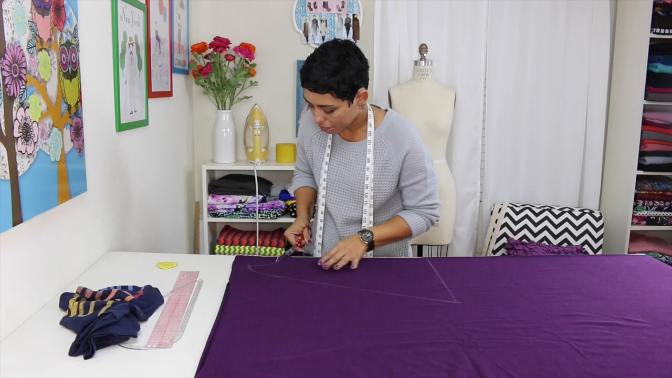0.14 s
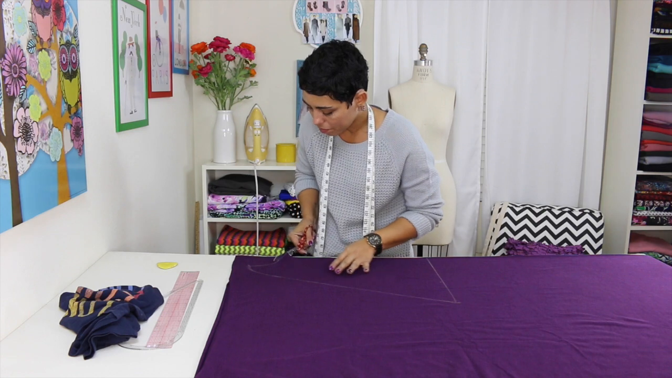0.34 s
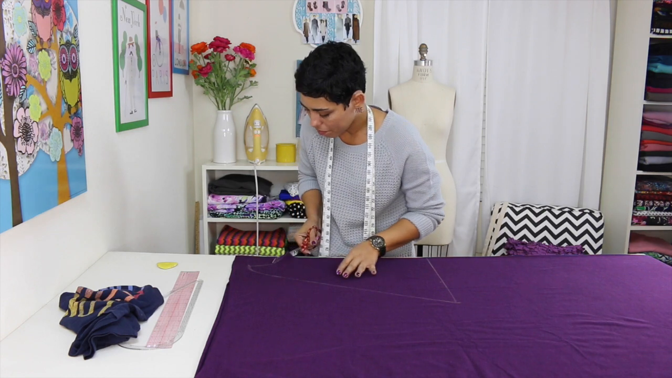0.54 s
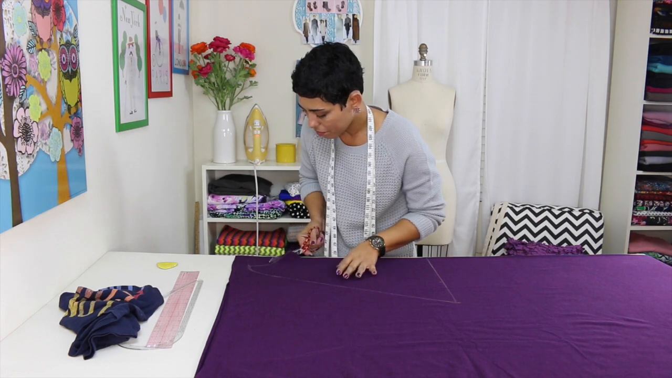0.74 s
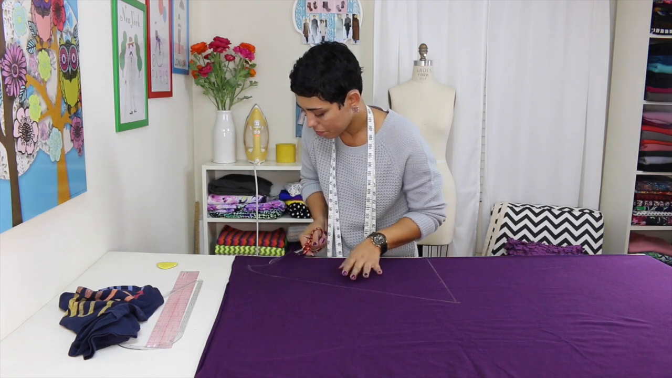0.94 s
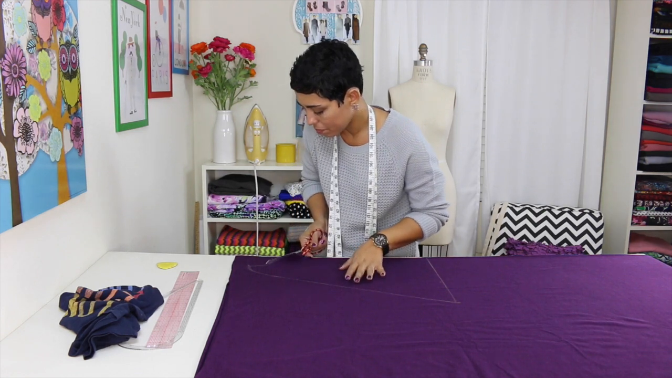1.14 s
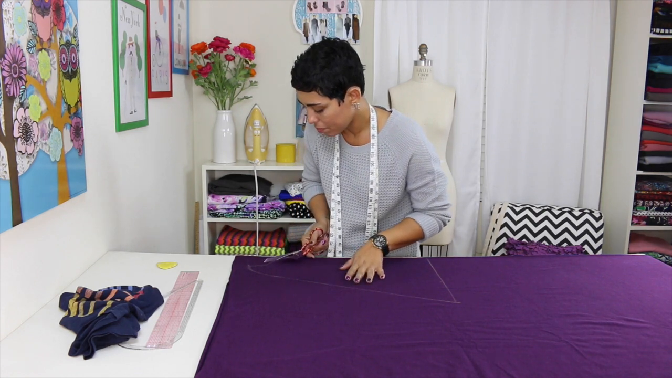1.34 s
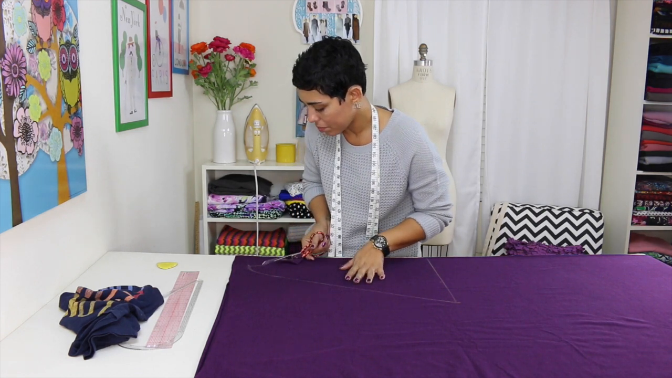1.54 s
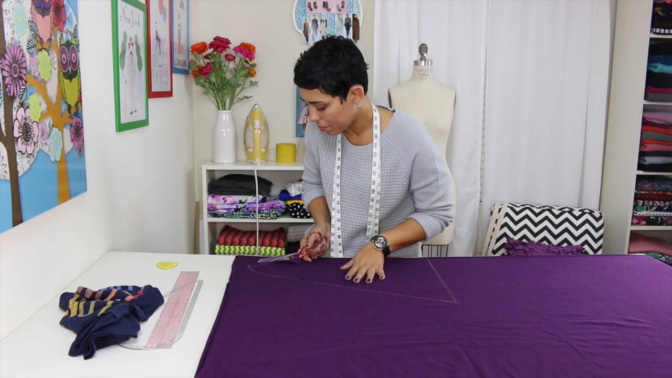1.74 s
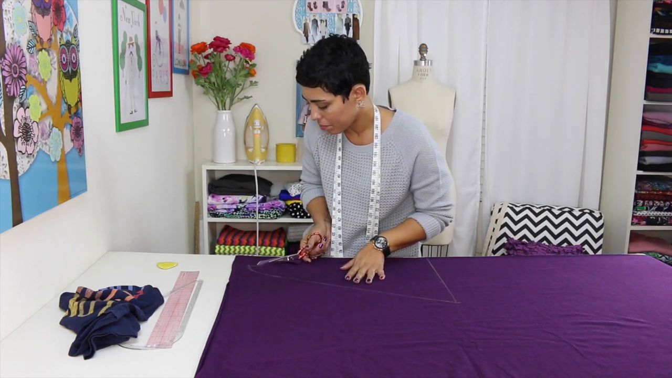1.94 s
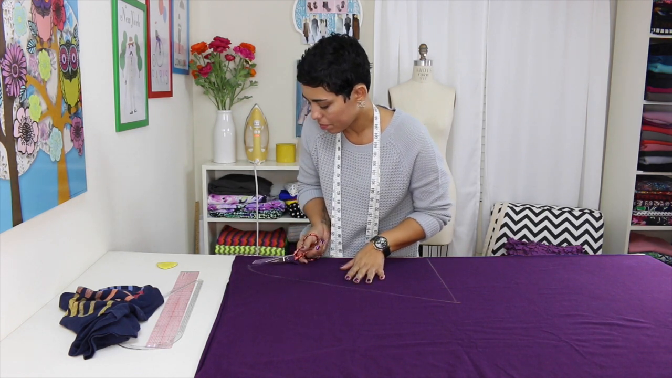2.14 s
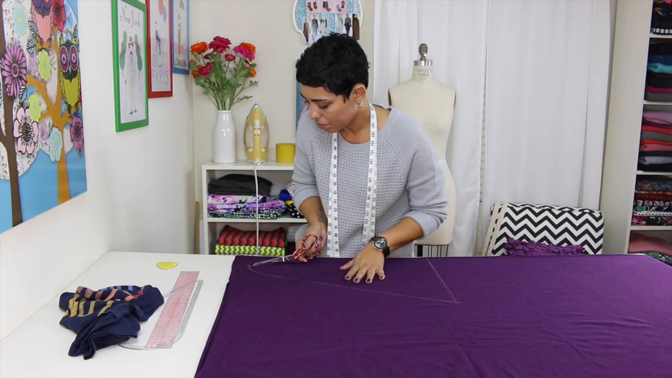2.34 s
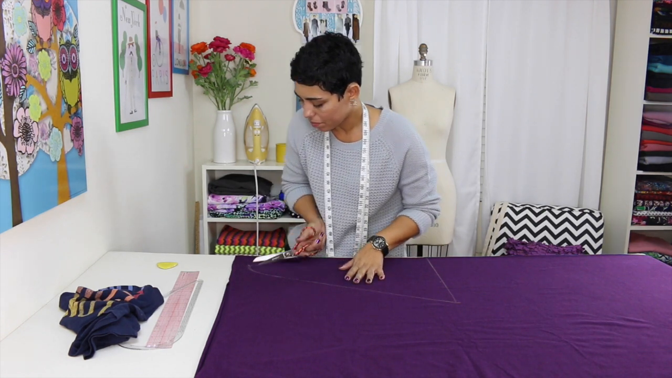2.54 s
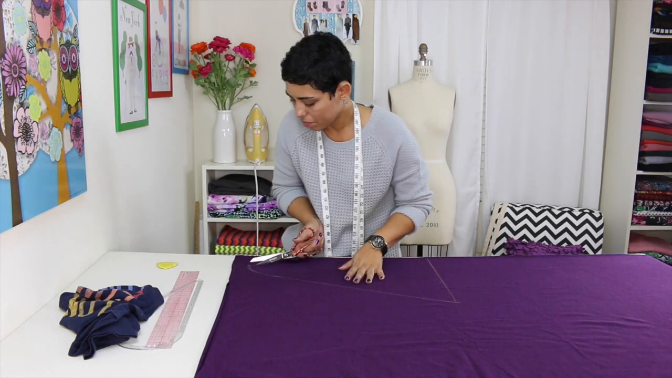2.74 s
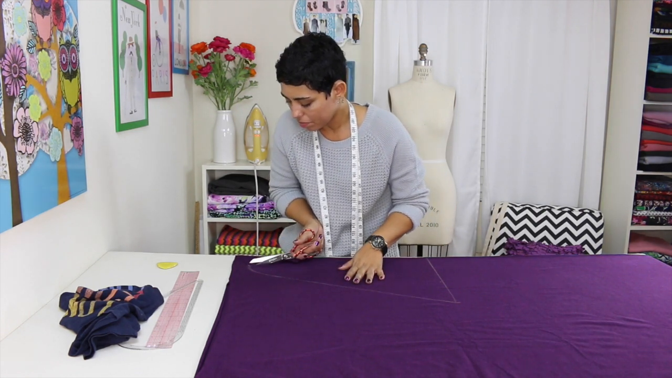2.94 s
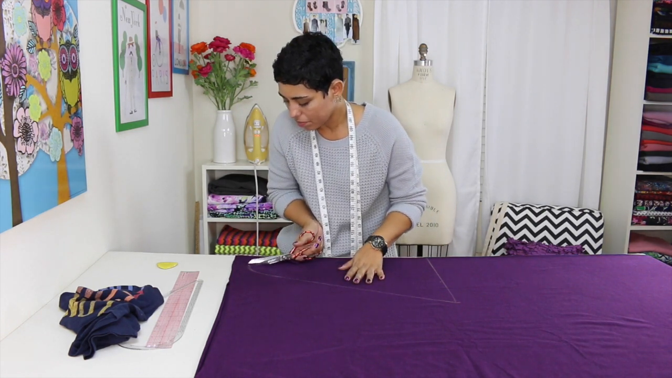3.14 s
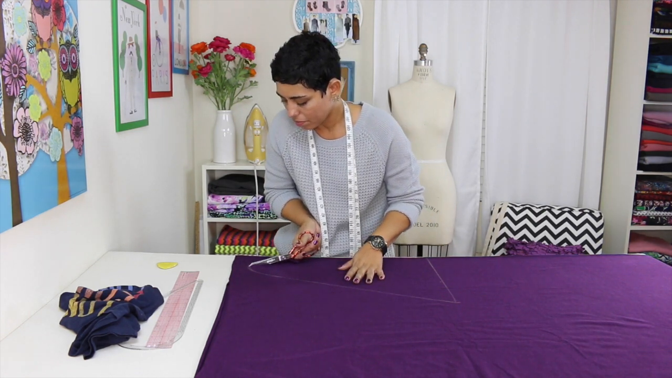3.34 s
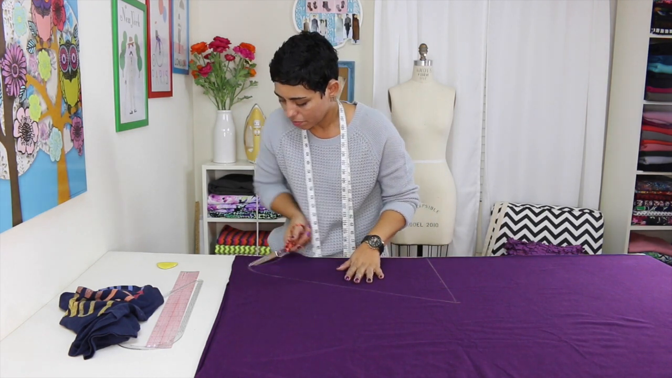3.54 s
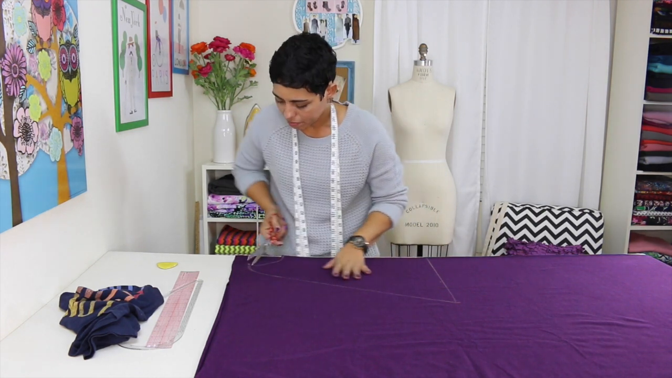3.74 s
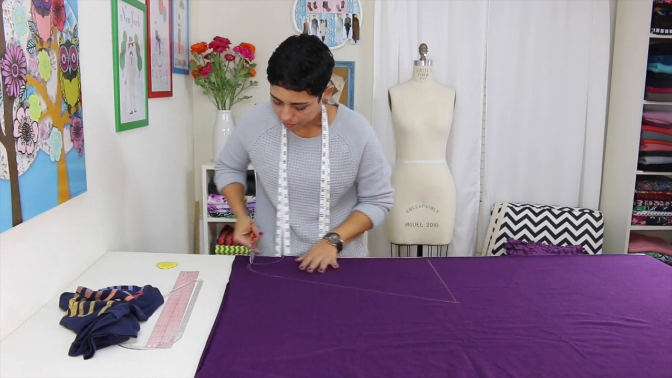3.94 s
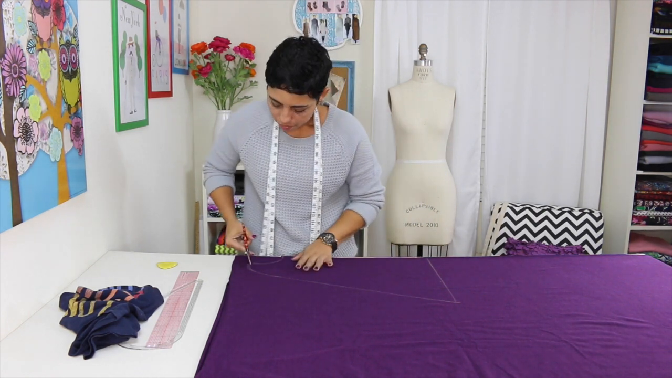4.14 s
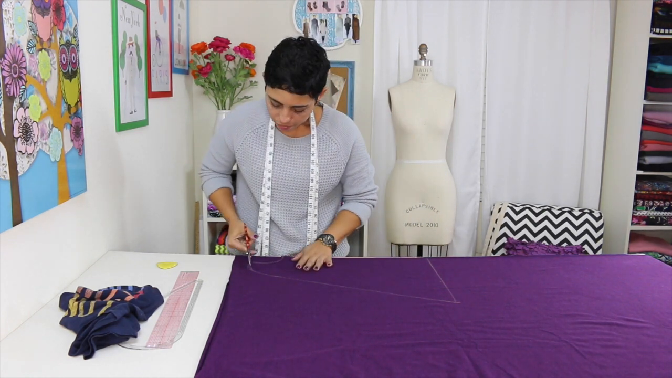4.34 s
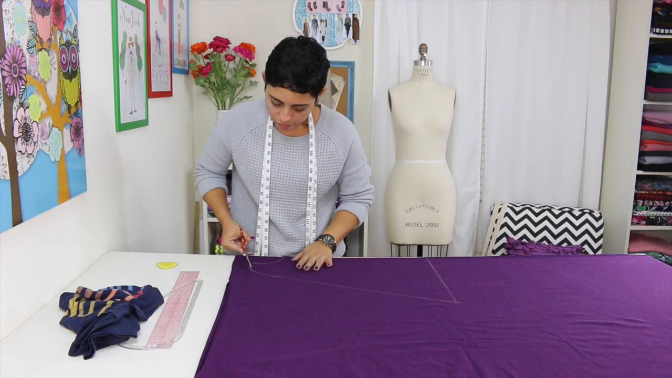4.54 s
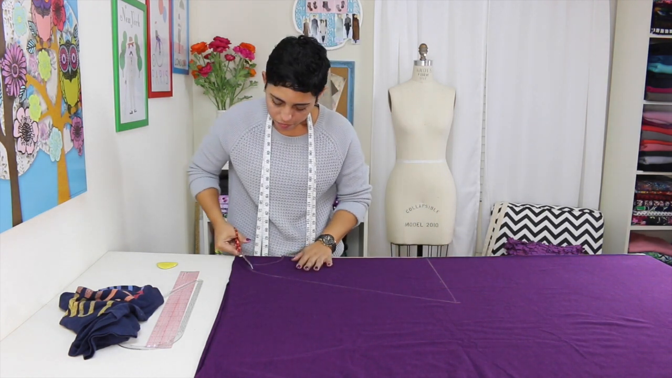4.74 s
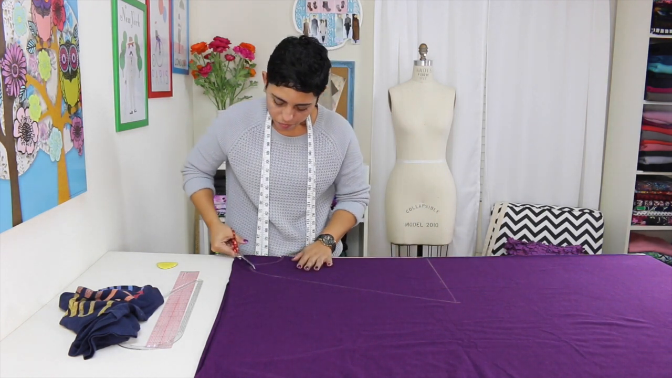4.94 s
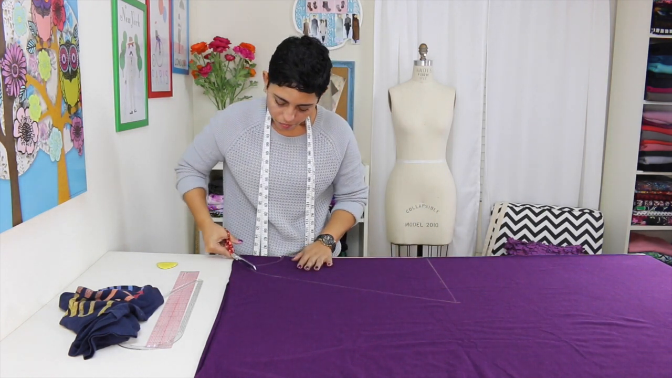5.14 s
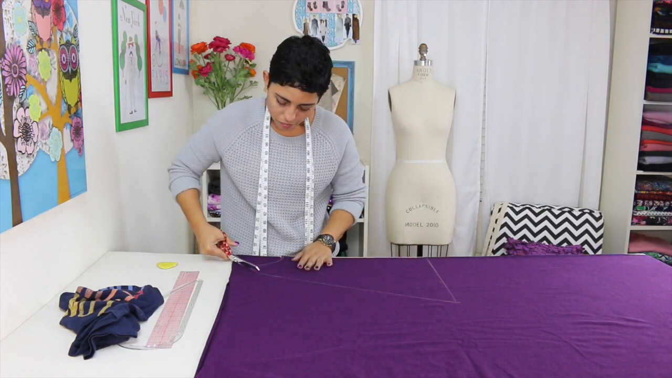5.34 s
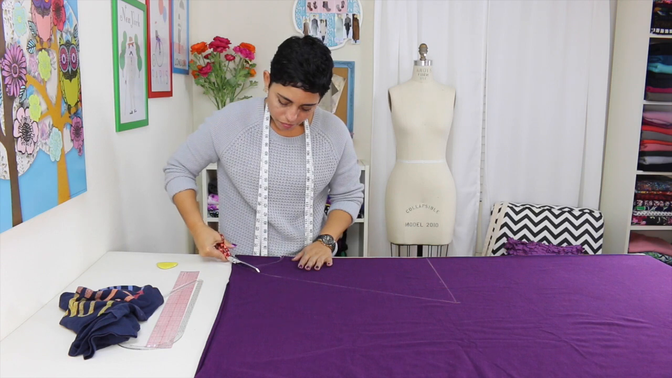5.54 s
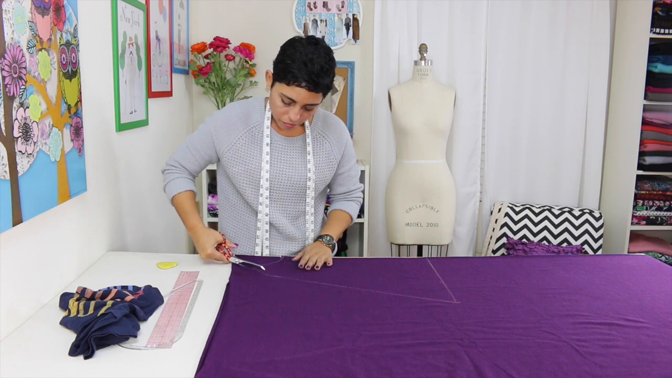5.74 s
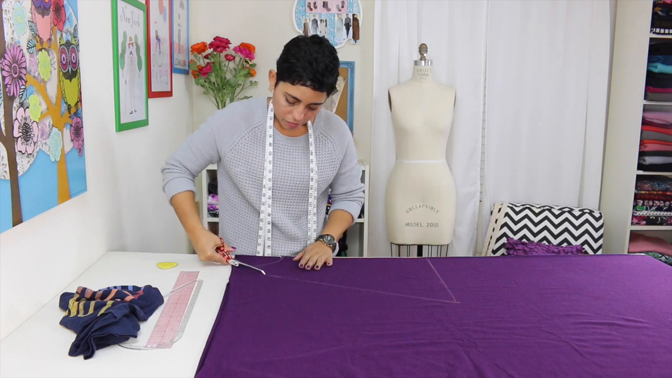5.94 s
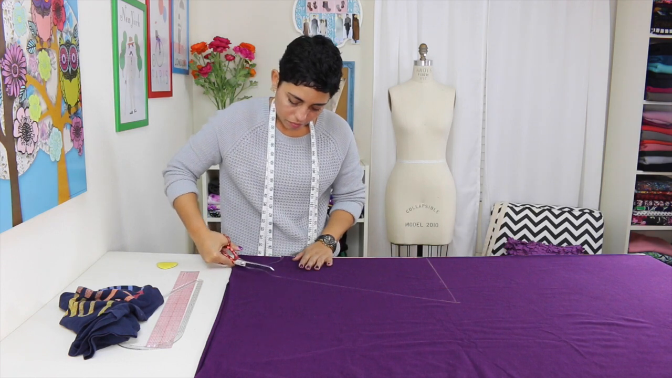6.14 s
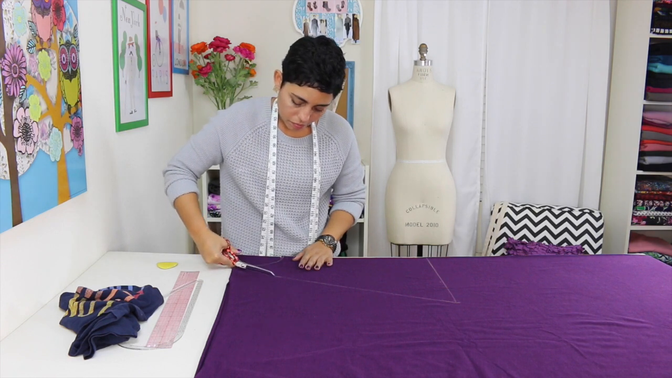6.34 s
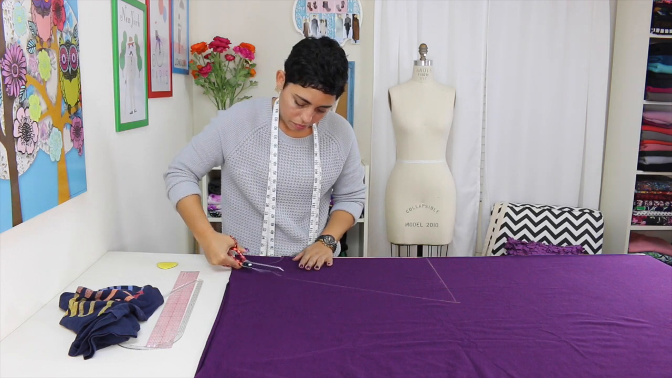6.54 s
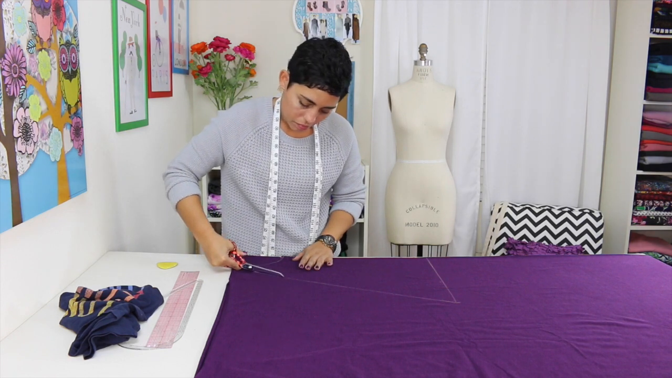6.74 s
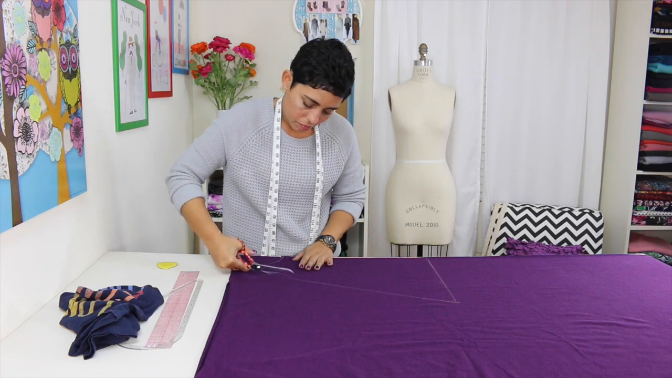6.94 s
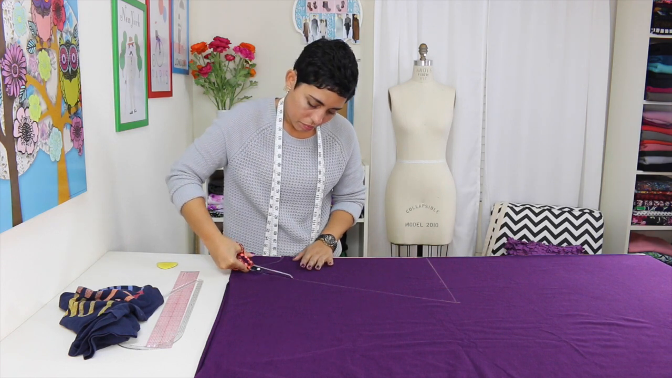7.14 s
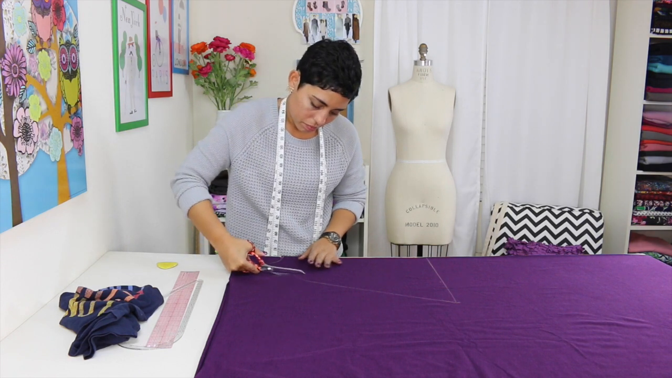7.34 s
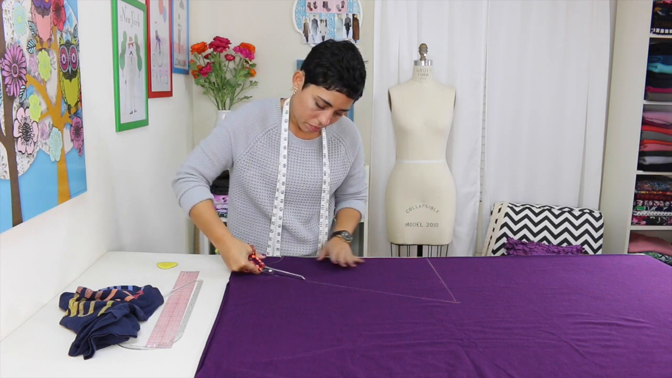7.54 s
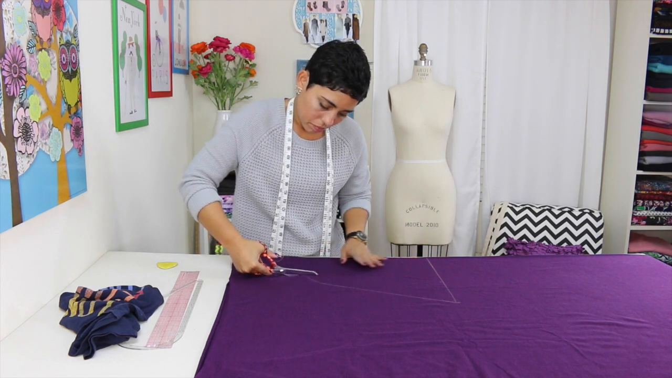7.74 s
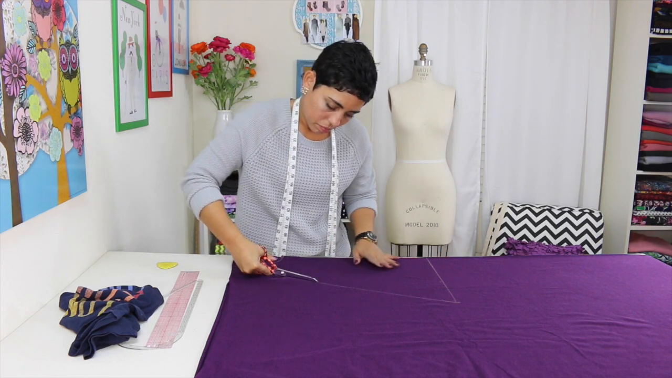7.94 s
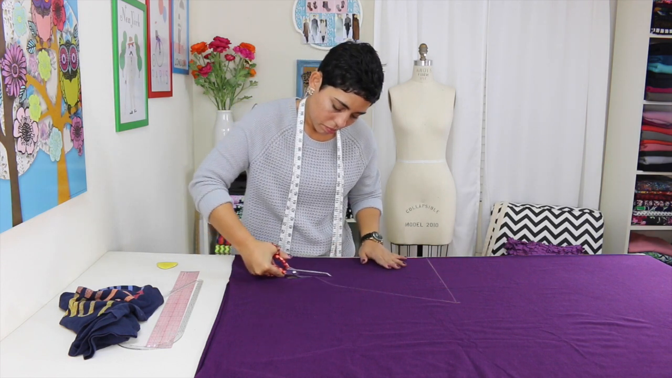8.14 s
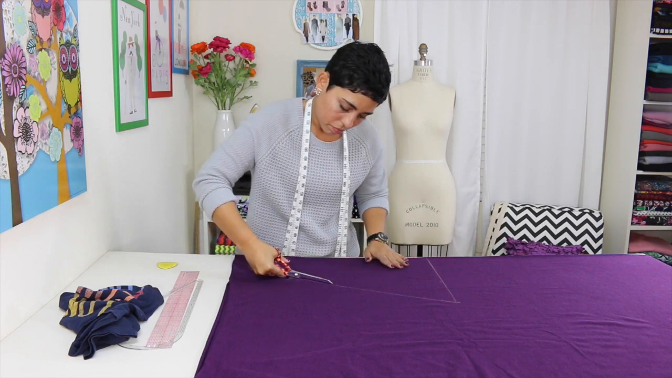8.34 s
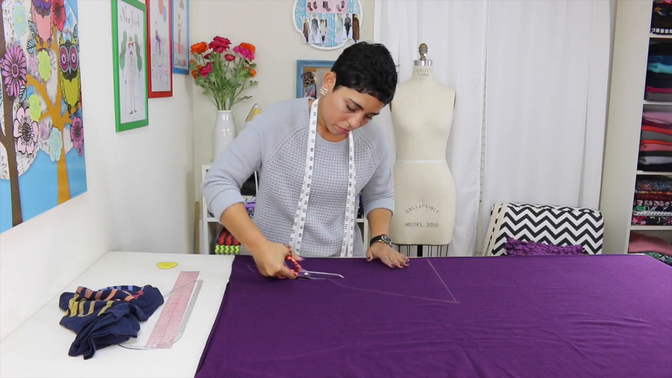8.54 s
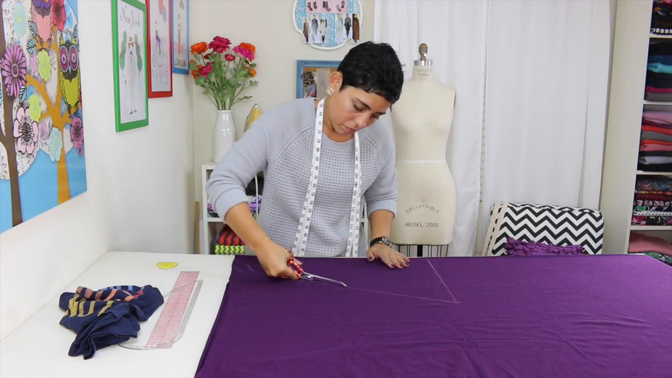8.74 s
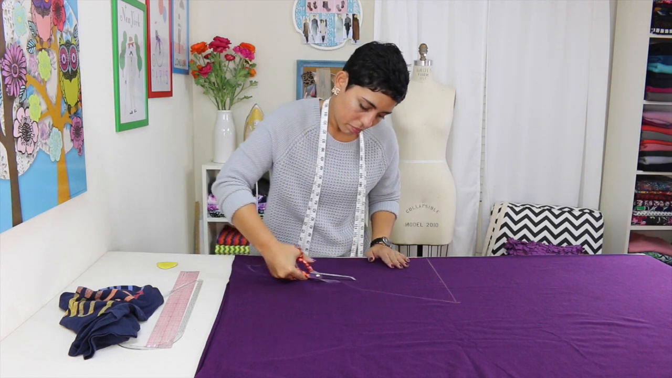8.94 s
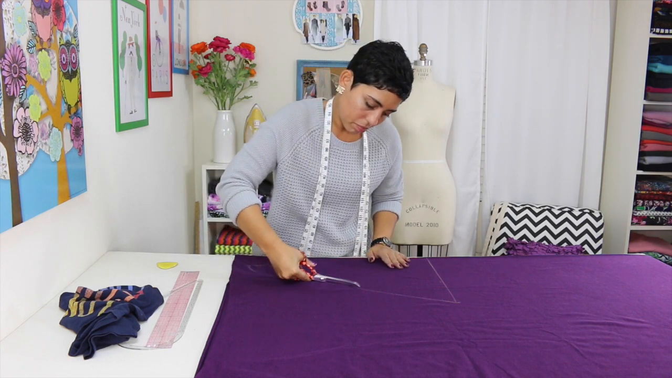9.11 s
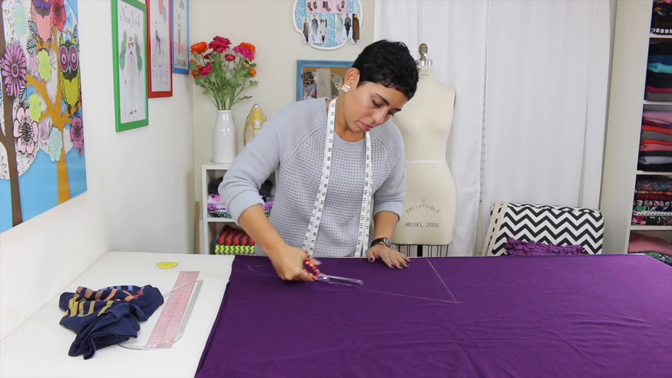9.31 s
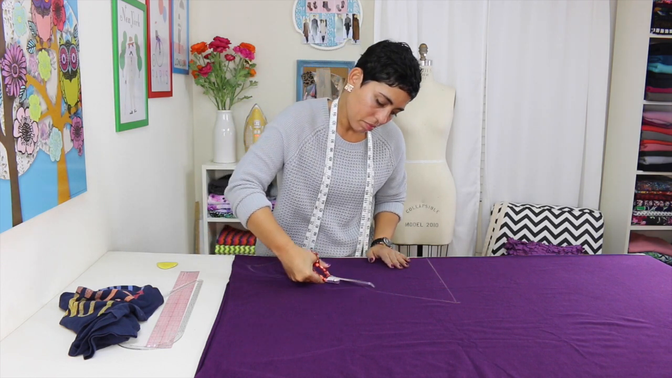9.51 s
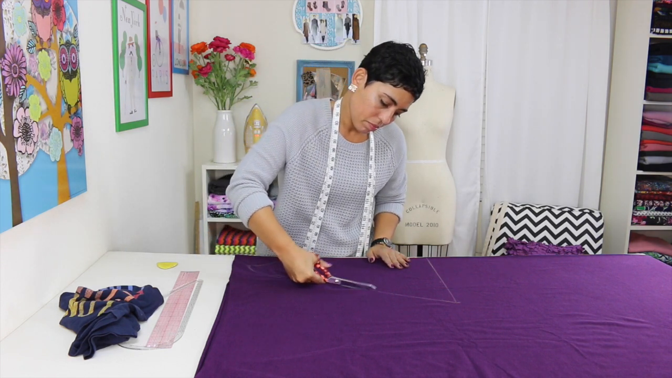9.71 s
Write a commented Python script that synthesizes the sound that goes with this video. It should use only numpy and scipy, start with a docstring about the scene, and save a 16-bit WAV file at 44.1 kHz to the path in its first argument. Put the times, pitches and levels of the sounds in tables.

```python
"""A small, dry room: tailor's shears cut cloth on a hollow table, in two runs of strokes.
Per stroke the lower blade lands, the edges scrape, threads snap ever faster, the shears shut softly and reopen.
Late in the second run the blades open wider and hiss. Something knocks once near the end of the first run;
between the runs the shears twice clack shut in the open. Random grains and noise drive resonant filters,
struck bodies are sums of dying sines; room noise, faint hums and a deep rumble lie beneath."""
import sys
import numpy as np
from scipy import signal
from scipy.fft import rfft, irfft, next_fast_len
from scipy.io import wavfile
from scipy.ndimage import uniform_filter1d

SR = 44100
rng = np.random.default_rng(int(sys.argv[2]) if len(sys.argv) > 2 else 0)


def waveform_to_disk(signal):
    """Save audio, clipped to [-1, 1], as 16-bit WAV at the path in sys.argv[1]."""
    frames = np.transpose(np.atleast_2d(signal))
    scaled = np.clip(frames, -1, 1) * 32767
    samples = np.round(scaled).astype(np.int16)
    wavfile.write(sys.argv[1], SR, samples)


N = 430857
TIME = np.arange(N) / SR
FREQS = np.fft.rfftfreq(N, 1 / SR)


def amp(db):
    """Decibels to gain."""
    return 10 ** (np.asarray(db) / 20)


def unit(x):
    """Scales to rms 1."""
    return x / np.sqrt(np.mean(x ** 2) + 1e-20)


def read(points, hz):
    """Joins table points on a log-frequency axis."""
    f, value = np.transpose(points)
    return np.interp(np.log(hz + 1), np.log(f + 1), value)


def add(mix, s, sound):
    """Mixes a sound in at time s."""
    part = mix[max(round(s * SR), 0):][:len(sound)]
    part += sound[:len(part)]


def humps(peaks, hz):
    """Power response of a set of resonances."""
    return sum(amp(db) ** 2 / (1 + ((hz - f) / width * np.sqrt(2)) ** 2) ** 2 for f, width, db in peaks)


def colour(x, base, peaks=(), size=4096):
    """Causal filter of unit energy: resonances standing on a broad base."""
    hz = abs(np.fft.fftfreq(size, 1 / SR))
    log_gain = np.log(amp(read(base, hz)) ** 2 + humps(peaks, hz)) / 2
    minimum_phase = np.exp(np.conj(signal.hilbert(log_gain)))
    taps = np.fft.ifft(minimum_phase).real[:size // 2]
    return signal.oaconvolve(x, taps / np.linalg.norm(taps))[:len(x)]


def resonate(x, hz, width_hz):
    """A resonance that follows the curve hz."""
    turn = np.exp(2j * np.pi * np.cumsum(hz) / SR)
    r = np.exp(-np.pi * width_hz / SR)
    return 2 * (turn * signal.lfilter([1 - r], [1, -r], x / turn)).real


def high_pass(x, corner_hz):
    """Takes away what lies under the corner."""
    return irfft(rfft(x) / (1 + (corner_hz / (FREQS + 1)) ** 8), N)


def ring(modes, factor=1, size=13000):
    """Dying sines of a struck body."""
    t = np.arange(size) / SR
    return sum(amp(db - 60 * t / t60) * np.sin(2 * np.pi * hz * factor * t) for hz, db, t60 in modes)


def grains(per_s, spread_db):
    """Random tiny slips of uneven size."""
    size = rng.standard_normal(N) * amp(spread_db * np.clip(rng.standard_normal(N), -2, 2))
    return unit(size * (rng.random(N) < per_s / SR))


def wobble(cutoff_hz):
    """Smooth random curve of rms 1."""
    size = next_fast_len(N, True)
    hz = np.fft.rfftfreq(size, 1 / SR)
    smooth = rfft(rng.standard_normal(size)) * np.exp(-(hz / cutoff_hz) ** 2)
    return unit(irfft(smooth, size)[:N])


def swells(rows):
    """Level curve from (time [s], rise [s], fall [s], level [dB]): the hand's pressure builds and eases."""
    power = np.zeros(N)
    for s, rise_s, fall_s, db in rows:
        near = slice(max(int((s - .5) * SR), 0), int((s + .5) * SR))
        t = TIME[near] - s
        power[near] += amp(db) ** 2 * np.exp(-(t / np.where(t < 0, rise_s, fall_s)) ** 2)
    return np.sqrt(power)


def wander(x, depth_db, size=512, count=5):
    """As the contact point runs along the blade, resonances come and go."""
    z = signal.stft(x, nperseg=size, noverlap=size * 3 // 4)[2]
    patches = uniform_filter1d(rng.standard_normal(z.shape), count, axis=0)
    patches = uniform_filter1d(patches, 2 * count, axis=1)
    gain = unit(amp(depth_db * np.clip(unit(patches), -2, 2)))
    return signal.istft(z * gain, nperseg=size, noverlap=size * 3 // 4)[1][:N]


# closings of the shears on cloth: (start [s], length [s], blade opening [0-1], crunch pitch [Hz], table rasp [dB],
# thread snaps [dB], edge scrape [dB], drag [dB], landing thud [dB], closing thud [dB])
CUTS = [(0.142, 0.083, 0.14, 1350, -59, -57, -60, -49.5, -40, -35),
        (0.482, 0.084, 0.18, 1310, -53.5, -54, -55.5, -49, -43, -34.5),
        (0.865, 0.09, 0.01, 1320, -53, -53.5, -52.5, -51.5, -39, -35.5),
        (1.212, 0.087, 0.08, 1270, -50, -51.5, -56, -48, -43, -39),
        (1.574, 0.073, 0.27, 900, -54, -52.5, -57.5, -48, -35.5, -41),
        (1.893, 0.081, 0.4, 935, -53.5, -55, -59.5, -46.5, -35.5, -39),
        (2.248, 0.065, 0.27, 940, -50, -54.5, -54.5, -45.5, -31, -37),
        (4.603, 0.17, 0.35, 1250, -57, -64.5, -60.5, -49.5, -41.5, -45),
        (5.068, 0.068, 0.13, 1200, -50, -57, -56.5, -42, -42, -37),
        (5.538, 0.064, 0.01, 1300, -48.5, -52.5, -52, -46, -60, -38),
        (5.92, 0.07, 0.11, 899, -47.5, -53.5, -48, -37.5, -29.5, -35),
        (6.296, 0.078, 0.3, 960, -49.5, -55, -54, -42, -31.5, -33),
        (6.699, 0.074, 0.46, 969, -49.5, -57, -53.5, -40.5, -35, -42),
        (7.076, 0.099, 0.66, 921, -51.5, -55, -54, -43, -39.5, -37.5),
        (7.49, 0.085, 0.84, 1052, -48.5, -60.5, -55, -42, -38.5, -32),
        (7.884, 0.098, 0.94, 1260, -48.5, -60, -53, -43.5, -45, -32.5),
        (8.303, 0.096, 1, 1200, -53, -60.5, -52, -42.5, -46, -35.5),
        (8.712, 0.11, 0.89, 950, -52, -61, -53, -46, -46, -39),
        (9.167, 0.095, 0.82, 1100, -53, -59, -53, -45.5, -43, -37.5),
        (9.582, 0.092, 0.85, 1253, -53, -57, -52.5, -49.5, -44, -38.5)]
START, LENGTH, WIDE, CRUNCH_HZ, RASP_DB, SNAPS_DB, SCRAPE_DB, DRAG_DB, LANDING_DB, CLOSING_DB = np.transpose(CUTS)
REOPEN_S = 0.14  # from shut to reopening


def current_stroke():
    """For each moment, the index of the nearest stroke."""
    middle = START + LENGTH / 2
    return np.searchsorted((middle[1:] + middle[:-1]) / 2, TIME)


def travel():
    """How far the nearest stroke has got: 0 as the edges engage, 1 when they are shut."""
    k = current_stroke()
    return (TIME - START[k]) / LENGTH[k]


def opening():
    """How wide the blades were opened for the nearest stroke, 0-1."""
    return np.clip(WIDE, 0, 1)[current_stroke()]


def pressure(db, peak, rise, fall):
    """One swell in every stroke; its peak, rise and fall are shares of the stroke's length."""
    return swells(zip(START + peak * LENGTH, rise * LENGTH, fall * LENGTH, db))


# threads heard through the blades, base: (frequency [Hz], level [dB])
THREAD_BASE = [(300, -21), (1200, -3), (2200, -10.5), (4000, -1), (7000, -6), (9000, -3.5), (15000, -25)]
# resonances on it: (frequency [Hz], width [Hz], level [dB])
THREAD_PEAKS = [(3120, 450, 5.5), (4600, 300, -25), (6060, 1300, -1)]


def threads(catch, first_hz=1270, last_hz=4400, peak=0.43, wide_later=0.47, zip_db=3, zip_peak=0.67):
    """The bite runs toward the tips, so threads part ever faster; wide strokes bite later and give a rising zip."""
    rate_hz = first_hz * (last_hz / first_hz) ** np.clip(travel(), 0, 1)
    turns = np.cumsum(rate_hz * (1 + .03 * wobble(150))) / SR
    partings = np.diff(np.floor(turns), prepend=0)  # one per whole turn
    snaps = unit(partings * (.4 + grains(SR, spread_db=5)))
    force = pressure(SNAPS_DB, peak + wide_later * WIDE, rise=0.48, fall=0.25)
    zipping = unit(np.sin(2 * np.pi * turns) * amp(2.5 * wobble(300))) * opening() ** 3
    pull = pressure(SNAPS_DB + zip_db, zip_peak, rise=0.35, fall=0.14)
    return colour(snaps * force * catch, THREAD_BASE, THREAD_PEAKS) + zipping * pull * catch


# rubbing edges, base: (frequency [Hz], level [dB])
RUB_BASE = [(300, -10.5), (1200, -3.5), (2500, -18.5), (6000, -7.5), (8500, -12), (12000, -17),
            (15000, -17)]
# their ring half shut, then wide open: (frequency [Hz], width [Hz], level [dB])
RUB_HALF_SHUT = [(6100, 170, 3.5), (8400, 540, -9), (10800, 220, 1.5), (11650, 190, 4.5), (11900, 300, -11),
                 (13300, 160, -1), (15400, 270, -27)]
RUB_WIDE_OPEN = [(8600, 1050, -4), (10080, 630, -2.5), (11600, 660, -3), (12900, 200, -15), (13900, 190, 0),
                 (15200, 240, -3)]
# empty shears swing open or shut, edge on edge: (time [s], rise [s], fall [s], level [dB])
EMPTY_SWINGS = [(2.413, 0.0048, 0.0049, -38), (2.6, 0.011, 0.02, -60.5), (3.388, 0.014, 0.0083, -54),
                (3.423, 0.003, 0.012, -44), (3.705, 0.017, 0.02, -63)]


def edges(catch, squeak_hz=9600, climb=0.21, climb_travel=0.68, squeak_width_hz=1500, squeak=0.7):
    """Steel slips on steel. Wide blades hiss at once, climbing as the free blade shortens; half-shut ones grate late."""
    wide = opening()
    slips = grains(4500, spread_db=2.2)
    pitch_hz = squeak_hz * (1 + climb * np.tanh(travel() / climb_travel))
    sliding = unit(slips + squeak * unit(resonate(slips, pitch_hz, squeak_width_hz)))
    early = pressure(SCRAPE_DB, peak=0.097, rise=.13, fall=0.64) * np.sqrt(wide)
    late = pressure(SCRAPE_DB, peak=0.81, rise=0.41, fall=0.23) * np.sqrt(1 - wide)
    grit = grains(7000, spread_db=3)
    grating = np.hypot(late, swells(EMPTY_SWINGS))
    half_shut = colour(grit * grating * catch, RUB_BASE, RUB_HALF_SHUT)
    return half_shut + colour(sliding * early * catch, RUB_BASE, RUB_WIDE_OPEN)


# table top under the rasp, base: (frequency [Hz], level [dB])
TOP_BASE = [(60, -21), (130, -17.5), (310, -2.5), (390, -12), (800, -8.5), (1600, -17), (2200, -23.5),
            (3200, -19.5), (8000, -48)]
# upper resonances of the top: (frequency [Hz], width [Hz], level [dB])
TOP_PEAKS = [(203, 49, 3), (253, 30, 2), (285.7, 9.3, 9), (507, 15, -1.5), (578, 27, -9.5), (749, 39, -6),
             (895, 64, -1), (993.5, 20.5, 0.5), (1273, 110, -4), (1430, 71, -24)]


def rasp(catch, peak=0.38, wide_later=0.17, focus=0.58, focus_width_hz=350, slide_db=-14, slide_s=0.034):
    """The crunch of the cloth passes down the lower blade into the table; on reopening the blade slides on softly."""
    force = pressure(RASP_DB, peak + wide_later * WIDE, rise=0.36, fall=0.46)
    reopening = START + LENGTH + REOPEN_S
    slide = swells([(s, slide_s, slide_s, db) for s, db in zip(reopening, RASP_DB + slide_db)])
    fibres = grains(3600, spread_db=1.6)
    fibres = unit(fibres + focus * resonate(fibres, CRUNCH_HZ[current_stroke()], focus_width_hz))
    return colour(fibres * np.hypot(force * catch, slide), TOP_BASE, TOP_PEAKS)


def rustle(catch, rustle_db=-12.0, wide_db=-7, lead_s=0.0036, rise_s=0.041, fall_s=0.055, centre_hz=1350, width_hz=520):
    """The blades are fed forward into the cloth around each stroke's start; narrow openings rustle most."""
    steady_hz = np.full(N, centre_hz)
    fibres = resonate(grains(3000, spread_db=2.5), steady_hz, width_hz)
    fibres = unit(resonate(fibres, steady_hz, width_hz))
    levels_db = RASP_DB + rustle_db + wide_db * WIDE
    return fibres * catch * swells([(s - lead_s, rise_s, fall_s, db) for s, db in zip(START, levels_db)])


# pitch around which the top answers as the shears travel across it: (time [s], pitch [Hz])
TOP_PITCH = [(0, 136.5), (1.6, 119.5), (3.5, 117), (4.7, 125), (5.6, 141), (5.95, 166), (7.1, 142),
             (7.9, 167), (9.7, 154.5)]


def top_hz(s):
    """Pitch of the table top under the shears at time s."""
    return np.interp(s, *np.transpose(TOP_PITCH))


# low modes of the undamped table top: (frequency [Hz], level [dB], t60 [s])
TOP_MODES = [(86.5, -34, 0.46), (103.8, -2, 0.46), (118.4, 5, 0.22), (150.6, 5.5, 0.19), (179.8, 3, 0.18),
             (211, -4, 0.29), (250.8, 4, 0.18), (288, -22, 0.13)]


def drag(width_hz=140, peak=0.4, wide_later=0.22, resting_db=-64):
    """The lower blade judders along the table: hard within a stroke, faintly just before and after it."""
    judder = resonate(rng.standard_normal(N), top_hz(TIME), width_hz)
    hum = unit(signal.oaconvolve(judder, ring(TOP_MODES))[:N])
    pushing = pressure(DRAG_DB, peak + wide_later * WIDE, rise=0.51, fall=0.66)
    resting = pressure(np.full(len(START), resting_db), peak=1.0, rise=2.2, fall=2.0)
    return hum * np.hypot(pushing, resting)


# hand and shears bump the table: (time [s], level [dB])
HAND_BUMPS = [(1.676, -41.5), (2.428, -29.5), (2.595, -51), (3.342, -43.5), (3.403, -38.5), (3.45, -34.5),
              (3.707, -50), (5.457, -38)]
NUDGE_DB, NUDGE_WIDE_DB = -45, -12  # reopening nudge; its change at full opening


def thuds(contact_s=0.0088, damping_s=.1, jolt_db=4, jolt_from=0.298, jolt_to=.65):
    """The lower blade lands, jolts once on the way, shuts and reopens; each soft push wakes the hand-damped table."""
    out, top = np.zeros(N), ring(TOP_MODES)
    top = top * np.exp(-TIME[:len(top)] / damping_s)
    t = np.arange(-.025, .025, 1 / SR)
    shut = START + LENGTH
    jolts = START + LENGTH * (jolt_from + (jolt_to - jolt_from) * rng.random(len(START)))
    pushes = [*zip(START, LANDING_DB), *zip(jolts, DRAG_DB + jolt_db), *zip(shut, CLOSING_DB),
              *zip(shut + REOPEN_S, NUDGE_DB + NUDGE_WIDE_DB * WIDE), *HAND_BUMPS]
    for s, db in pushes:
        push = np.sin(2 * np.pi * top_hz(s) * t) * np.exp(-(t / contact_s) ** 2)
        thud = signal.fftconvolve(push, top)
        add(out, s + t[0], amp(db) * thud / abs(thud).max())
    return out


# shears hit their stop: (time [s], level [dB], resonance factor [1], crack fade [s], ring [dB], chatter [dB],
# dip in the colour [Hz])
STOP_HITS = [(2.42, -18.5, 1.035, 0.001, -29.5, -19.5, 4720), (3.449, -15, 1.0, 0.00055, -32, -17.5, 6400)]
# crack of steel on steel, base: (frequency [Hz], level [dB])
CRACK_BASE = [(200, -11), (700, -14), (1100, -6), (2400, -14), (3400, -5), (5000, -8), (7100, 0),
              (8500, -10), (10000, -3), (12400, 0.5), (14200, -1), (15500, -21)]
# crack resonances before the factor: (frequency [Hz], width [Hz], level [dB])
CRACK_HUMPS = [(1800, 200, -9), (3340, 460, 2), (4700, 370, 5.5), (5310, 180, 5.5), (6070, 130, 6),
               (8200, 570, 6.5), (8860, 530, 4.5), (11100, 660, 2.5), (11950, 980, 2)]
# blade modes before the factor: (frequency [Hz], level [dB], t60 [s])
STEEL_MODES = [(1775, -1, 0.081), (2510, -4, 0.11), (3400, 4.5, 0.065), (3520, -5, .16), (3650, -2, 0.1),
               (4180, -18, .12), (4480, -13, 0.1), (4300, -16, 0.11), (4930, -6, 0.077), (5470, -8, .13),
               (6020, -17, .08), (6670, -15, .09), (8000, 10, 0.06), (7940, -13, .13), (8500, -17, 0.11),
               (8520, -17, 0.083), (9350, -2, 0.11), (9250, -16, 0.1), (10300, -12, .12),
               (10200, -7, 0.087), (11100, -12, 0.16), (11800, -9, .12), (12100, -3, 0.16),
               (12920, -1, 0.15), (13300, -7, .1), (13900, -5, .1)]


def clacks(chatter_s=0.018, dip_width_hz=700):
    """A very short crack, a brief chatter of edge on edge, and the dying ring of the blades."""
    out = np.zeros(N)
    for s, db, factor, fade_s, ring_db, chatter_db, dip_hz in STOP_HITS:
        blades = ring(STEEL_MODES, factor)
        t = TIME[:len(blades)]
        fading = np.exp(-t / fade_s) + amp(chatter_db) * np.exp(-t / chatter_s)
        contact = rng.choice([-1, 1], len(t)) * fading
        peaks = [(hz * factor, width, level) for hz, width, level in CRACK_HUMPS]
        crack = colour(contact, CRACK_BASE, peaks)
        dip = signal.iirnotch(dip_hz, dip_hz / dip_width_hz, SR)
        add(out, s, amp(db) * signal.lfilter(*dip, crack + amp(ring_db) * blades))
    return out


# two contacts of one dull knock: (time [s], level [dB])
KNOCK_HITS = [(2.204, -46), (2.2096, -36)]
# its ring: (frequency [Hz], level [dB], t60 [s])
HOLLOW_MODES = [(245, -7, 0.066), (388, 5.5, 0.025), (489, 4.5, 0.021), (580, -1, 0.054), (713, -33, .04)]


def knock(soft_s=0.00092):
    """A hollow, quickly damped knock with a soft start."""
    out, hollow = np.zeros(N), ring(HOLLOW_MODES)
    soft_start = 1 - np.exp(-(TIME[:len(hollow)] / soft_s) ** 2)
    for s, db in KNOCK_HITS:
        add(out, s, amp(db) * hollow * soft_start)
    return out


# room decay, limited in use to 0.12-0.4 s: (frequency [Hz], t60 [s])
TAIL_T60 = [(100, 0.19), (1000, 0.24), (4000, 0.21), (9000, 0.23), (15000, 0.057)]
# room against direct sound: (frequency [Hz], level [dB])
TAIL_LEVEL = [(100, -29), (200, -31), (400, -4.5), (1000, -4.5), (3500, 2.5), (8000, -5), (15000, -3)]
# lead of the left microphone: (frequency [Hz], phase [rad])
LEFT_LEAD = [(100, 0.077), (1000, 0), (2200, 0.32), (4200, 1.64), (8000, 1.3), (12000, 0.97)]


def room(x, first_s=0.0029, build_s=0.0011, size=16384):
    """The direct sound reaches two close microphones; a short dense tail follows."""
    hz, t, z = signal.stft(rng.standard_normal((2, size)), SR, nperseg=256)
    decay = amp(-60 * t / np.clip(read(TAIL_T60, hz), .12, .4)[:, None])
    decay = decay * (1 - np.exp(-np.maximum(t - first_s, 0) / build_s))
    decay *= amp(read(TAIL_LEVEL, hz))[:, None] / np.sqrt(size * np.mean(decay ** 2, axis=1, keepdims=True))
    tail = signal.istft(z * decay, SR)[1]
    lead = np.exp(.5j * read(LEFT_LEAD, FREQS))
    direct = irfft(rfft(x) * np.array([lead, lead.conj()]), N)
    return direct + signal.fftconvolve(x[None], tail, axes=1)[:, :N]


# spectrum of room air and microphone hiss: (frequency [Hz], relative density [dB per Hz])
AIR_SPECTRUM = [(12, -38), (20, -17), (48, -6), (70, -4), (113, -2.5), (187, -8.5), (227, -3.5),
                (268, -9.5), (365, -8.5), (554, -11.5), (1020, -14), (1210, -14), (1350, -16),
                (3220, -17.5), (15800, -26)]
# left-right likeness: (frequency [Hz], correlation [-1 to 1])
AIR_LIKENESS = [(60, 0.91), (130, 0.89), (290, 0.6), (640, 0.39), (1410, 0.35), (3100, -0.058),
                (6820, 0.12), (15000, -0.17)]
# faint hums: (frequency [Hz], width [Hz], level over the air [dB])
ROOM_HUMS = [(128, 9.7, 3), (249, 15, -11), (989, 74, 1.5)]
AIR_DB = -56


def air():
    """Steady room noise with faint hums, alike in both channels in the bass."""
    left, other = rfft(rng.standard_normal((2, N)))
    same = np.clip(read(AIR_LIKENESS, FREQS), -1, 1)
    pair = np.array([left, same * left + np.sqrt(1 - same ** 2) * other])
    shape = amp(read(AIR_SPECTRUM, FREQS)) * np.sqrt(1 + humps(ROOM_HUMS, FREQS))
    return amp(AIR_DB) * unit(high_pass(irfft(pair * shape, N), corner_hz=28.7))


# faint deep rumble: (time [s], level [dB])
RUMBLE_LEVEL = [(0, -81), (1.8, -68), (3, -72), (5.5, -85), (6.6, -67), (7.4, -63), (8, -90), (9.77, -78)]


def rumble(centre_hz=44, width_hz=10):
    """A narrow, deep drone that swells slowly."""
    band = np.exp(-((FREQS - centre_hz) / width_hz) ** 2)
    drone = irfft(rfft(rng.standard_normal(N)) * band, N)
    return amp(np.interp(TIME, *np.transpose(RUMBLE_LEVEL))) * unit(drone)


def scene(steel_left_db=-0.06, table_left_db=0.17):
    """Shears and table in the room; the blades catch and slip, shaking snaps, scrape, rasp and rustle together."""
    catch = amp(1.7 * wobble(60))
    cutting = wander(threads(catch) + edges(catch), depth_db=4)
    crunch = wander(rasp(catch) + rustle(catch), depth_db=2.2)
    steel = room(cutting + clacks())
    table = room(high_pass(crunch + drag() + thuds() + knock(), corner_hz=63.5))  # the top radiates no deep bass
    sides = np.array([[1], [-1]])
    return steel * amp(steel_left_db * sides) + table * amp(table_left_db * sides) + air() + rumble()


EDGE_HZ = 15800


def record(dry):
    """The recorder's band limit: a linear-phase low-pass."""
    taps = signal.firwin(511, EDGE_HZ, window=("kaiser", 9), fs=SR)
    return signal.oaconvolve(dry, taps[None], "same", axes=1)


dry = scene()
out = record(dry)
waveform_to_disk(out)
```